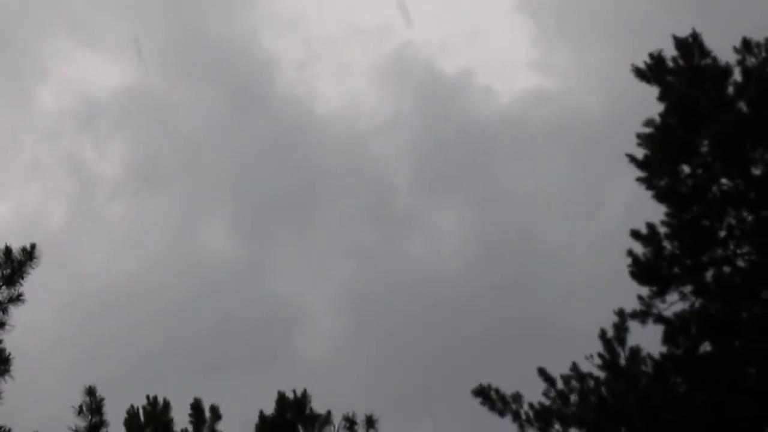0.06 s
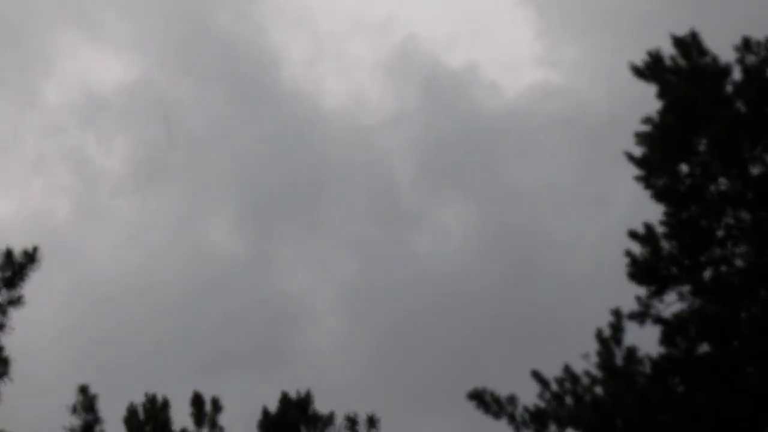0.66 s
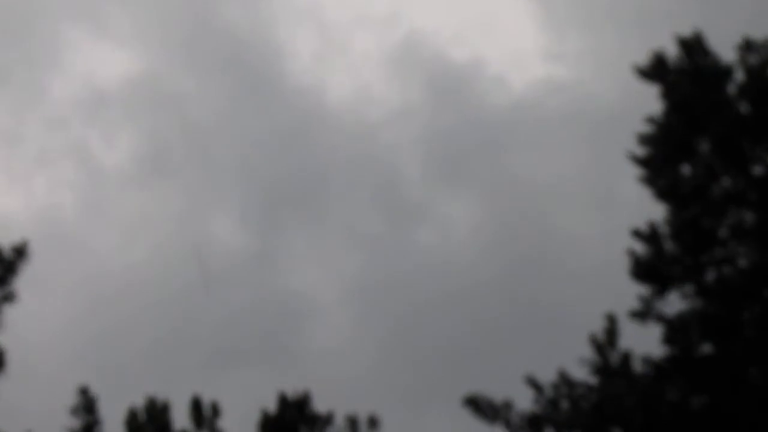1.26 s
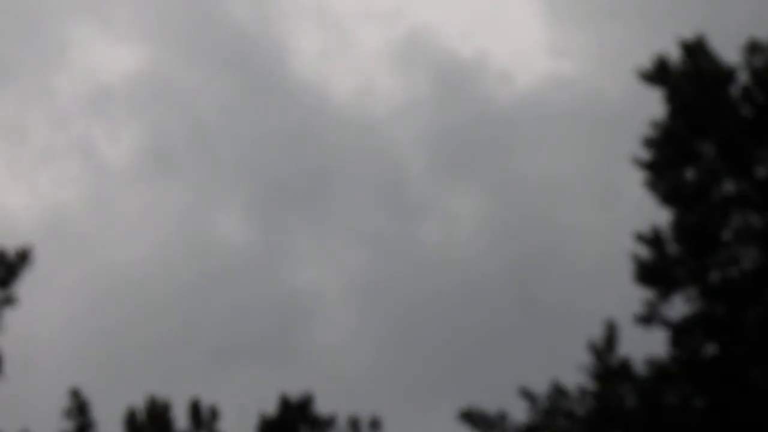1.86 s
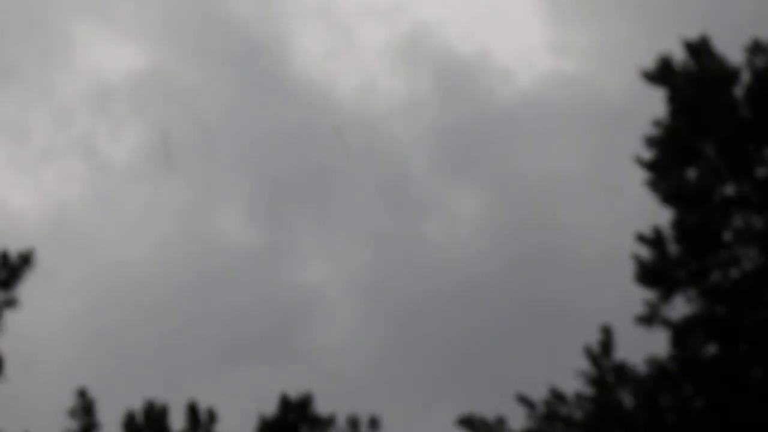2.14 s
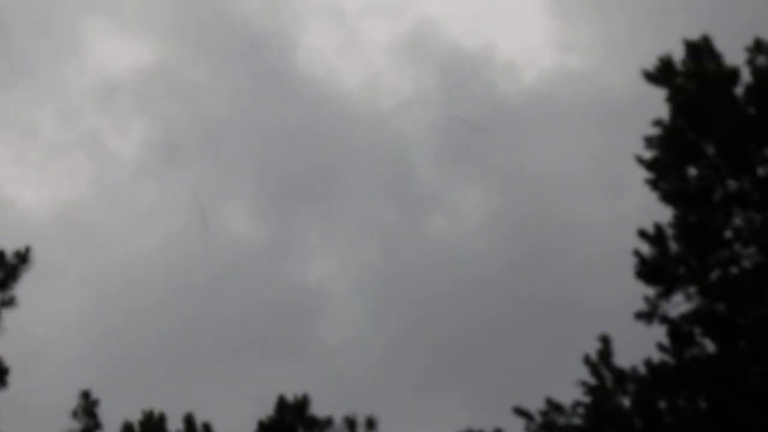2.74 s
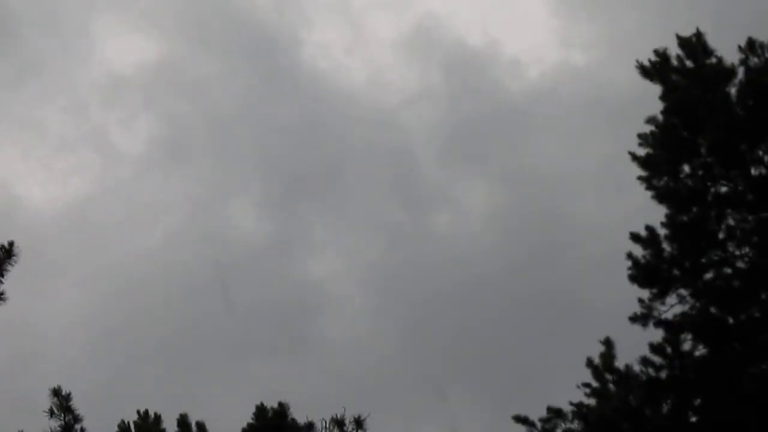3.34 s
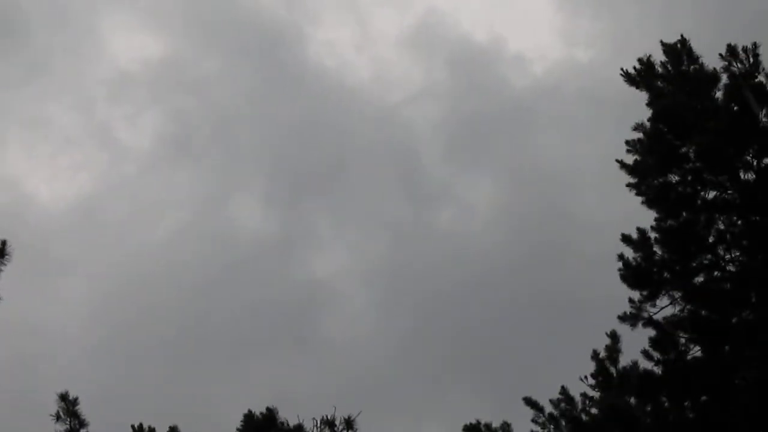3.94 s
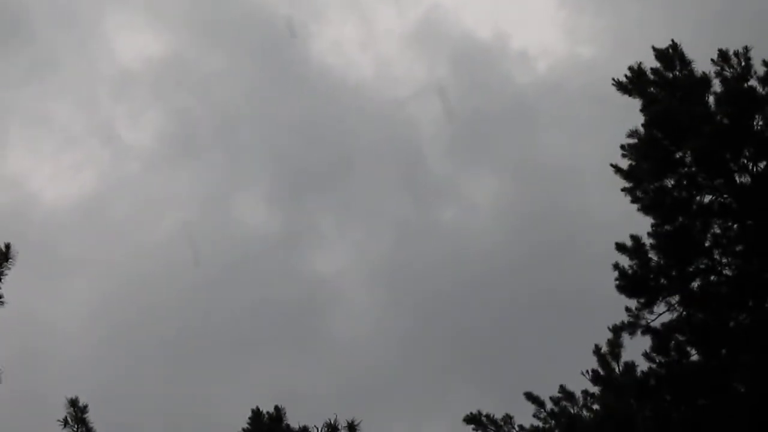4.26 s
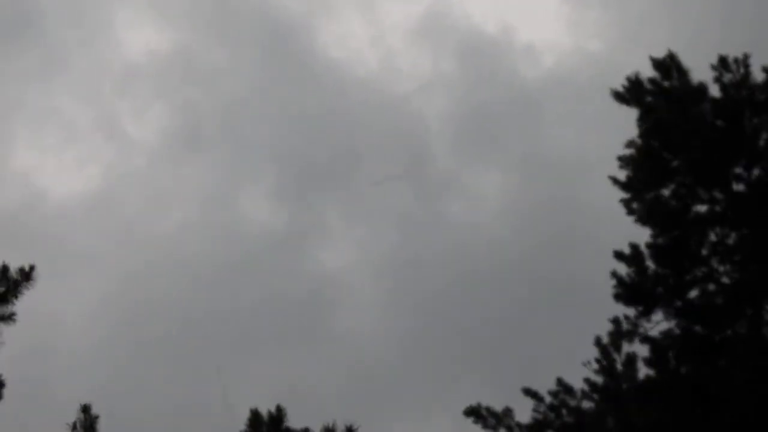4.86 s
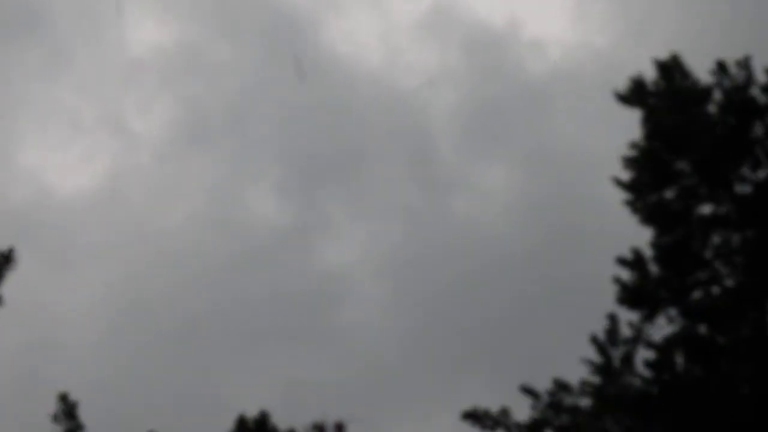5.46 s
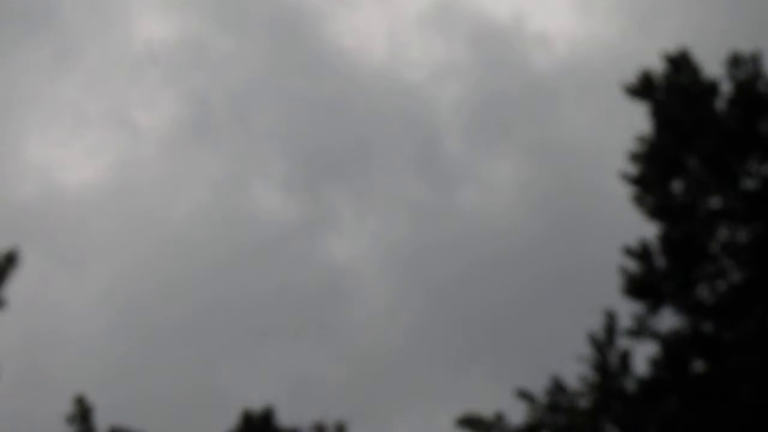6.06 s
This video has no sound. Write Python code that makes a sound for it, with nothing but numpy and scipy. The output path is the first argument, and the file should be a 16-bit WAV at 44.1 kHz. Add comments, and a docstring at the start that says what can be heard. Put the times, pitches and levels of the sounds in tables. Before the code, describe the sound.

Outdoors among trees, light rain makes a soft, wide hiss, with sharp ticks on nearby leaves and a few fat drips. Far thunder dominates from the start, rumbling and booming several times, then fading after about four seconds. The rain carries on with dull slaps of water on the ground. Close to the microphone sit a quiet motor hum and a barely audible lens whirr.

```python
"""Distant thunder rolls for four seconds, ends in a heavy double boom and dies away over light rain.
Shock waves from all along the lightning channel crowd into a rumble; the strongest land as booms.
Far drops merge into patter and hiss among the trees, near ones tick on leaves, fat drips splash
and run-off slaps the ground. A small motor hums throughout and a lens drive whirrs faintly."""
import sys
import numpy as np
from scipy import signal
from scipy.fft import rfft, irfft, next_fast_len
from scipy.io import wavfile
from scipy.ndimage import uniform_filter1d

SR = 44100
rng = np.random.default_rng(int(sys.argv[2]) if len(sys.argv) > 2 else 0)


def log_audio(samples):
    """Write samples as a 16-bit WAV file to the path given in sys.argv[1]."""
    # one column per channel
    frames = np.atleast_2d(samples).T
    # limit to full scale, then quantise
    limited = np.clip(frames, -1, 1)
    pcm = np.round(limited * 32767).astype(np.int16)
    wavfile.write(sys.argv[1], SR, pcm)


N = 272979
TIME = np.arange(N) / SR
SIDES = np.array([[1], [-1]])   # left, right
ATTACK_S, RELEASE_DB_PER_S, BASS_RELEASE_DB_PER_S = 0.026, 88, 78


def thunder_roll(body_db, bass_db, growl_db, crackle_db, shudder_db):
    """Shocks from all along the crooked channel arrive in a crowd, dulled by miles of air."""
    # The tone of each thunder layer. Each row: frequency in Hz, relative level in dB.
    body_colour = [(50, -30), (85, -12), (103, 4.5), (146, -3.5), (192, 0.5), (261, -6.5), (307, -21),
                   (345, -21.5), (400, -40.5), (520, -38.5), (880, -120)]
    bass_colour = [(48, -8), (55, -23), (63, 2.5), (78, 0), (95, -2.5), (112, -6.5)]
    shudder_colour = [(18, -24), (28, -23), (40, -6), (52, -3), (64, -27)]
    growl_colour = [(220, -10), (300, 2), (350, -6.5), (420, -14.5), (600, -28), (850, -24), (1300, -57)]
    crackle_colour = [(380, 5), (480, 13), (650, 11.5), (850, -5.5), (1300, -14)]
    body, bass, growl, crackle = thunder_envelopes()
    shudder = bass ** 0.49   # the deepest layer follows about half of the bass's swing in dB
    out = from_db(body_db) * body * evened(outdoors(arrivals(700, 1.55), body_colour), span_s=0.073)
    out += from_db(bass_db) * bass * evened(outdoors(arrivals(400, 0.77), bass_colour), span_s=0.074)
    out += from_db(shudder_db) * shudder * evened(outdoors(arrivals(300, 2), shudder_colour), span_s=0.42)
    # shocks with a shorter path keep their sharper edges; the crackle leans right
    out += from_db(growl_db) * growl * outdoors(arrivals(600, 1.9), growl_colour)
    out += from_db(crackle_db - 1.5 * SIDES) * crackle * outdoors(arrivals(350, 2.9), crackle_colour)
    return out


def thunder_envelopes():
    """Peals add in power to a fading rumble: gains for the body, bass, growl and crackle."""
    # One peal from each stretch of the channel. Each row: start and hold in seconds,
    # relative level in dB, then offsets in dB for bass, growl and crackle.
    peals = [(-0.04, 0.013, -10.5, -19, -21, -33), (0.093, 0.079, -29, 8.5, -9, -28),
             (0.168, 0.026, -24.5, -1, -12, -36), (0.417, 0.13, -24, -6, -19, -28.5),
             (0.617, 0.033, -15.5, -17, -24, -35), (1.002, .04, -24, -2.5, -13, -38),
             (1.169, .10, -14.5, -5, -21, -33.5), (1.316, 0.068, -14, -7, -22, -29),
             (1.46, 0.09, -24, -8, -14, -29), (1.652, 0.17, -19.5, -4, -24, -30),
             (1.94, 0.12, -33.5, 1, -22, -36), (2.217, 0.052, -26.5, 4, -34, -42),
             (2.457, .14, -24.5, 3.5, -19, -44), (2.719, 0.17, -21.5, -7, -21, -46),
             (3.23, 0.032, -23, -2, -32, -46), (3.386, 0.094, -35.5, 11, -32, -44),
             (3.694, 0.13, -22, 7, -28, -47), (3.792, 0.066, -21, 3.5, -10.5, -49),
             (4.173, 0.18, -34.5, 7, -23, -30)]
    sag_db_per_s, fade_db_per_s, fade_start_s = 0.36, 12.5, 4.11
    rumble = from_db(-23 - sag_db_per_s * TIME - fade_db_per_s * np.maximum(TIME - fade_start_s, 0))
    # all but the crackle settle on a floor, a far murmur
    body = np.hypot(rumble, from_db(-39))
    bass = np.hypot(rumble * from_db(-9.5), from_db(-41))
    growl = np.hypot(rumble * from_db(-21.5), from_db(-52))
    crackle = rumble * from_db(-35)
    for s, hold_s, db, bass_db, growl_db, crackle_db in peals:
        peal = from_db(db) * swell(s, hold_s, RELEASE_DB_PER_S)
        body = np.hypot(body, peal)
        bass = np.hypot(bass, from_db(db + bass_db) * swell(s, hold_s, BASS_RELEASE_DB_PER_S))
        growl = np.hypot(growl, peal * from_db(growl_db))
        crackle = np.hypot(crackle, peal * from_db(crackle_db))
    return body, bass, growl, crackle


def thunder_booms(trim_db, low_cut_ratio, high_hz):
    """Each strong front is one N-shaped pressure wave, its corners rounded off on the way."""
    # The strongest shock fronts. Each row: start in seconds, peak in dB before trim, pitch in Hz.
    fronts = [(0.007, -5, 115), (0.201, -23, 40), (0.209, -13, 122), (1.401, -12, 109), (1.790, -18, 39.8),
              (1.797, -0.5, 127), (1.812, -4, 112), (2.835, -6.5, 118), (3.285, -5, 195), (3.738, -12, 65),
              (3.815, -2.5, 70.6)]
    out, t = np.zeros((2, N)), TIME[:SR // 8]
    for s, db, hz in fronts:
        n_wave = (1 - 2 * t * hz) * (t * hz < 1)
        boom = band(n_wave, low_cut_ratio * hz, high_hz, order=4)
        add_at_peak(out, s, boom, db + trim_db)
    return out


def thunder_echoes(trim_db):
    """The farthest echoes come back with only a low, hollow note left."""
    # The last echoes. Each row: start and hold in seconds, level in dB before trim.
    echoes = [(4.61, 0.33, -37.5), (5.535, 0.017, -56), (5.704, 0.036, -35), (5.88, 0.073, -34),
              (6.134, .04, -39)]
    # Their hollow tone. Each row: frequency in Hz, relative level in dB.
    echo_colour = [(85, -6), (105, 2), (120, 3), (140, -12)]
    gain = sum(from_db(db + trim_db) * swell(s, hold_s, RELEASE_DB_PER_S) for s, hold_s, db in echoes)
    return gain * evened(outdoors(arrivals(420, 3.0), echo_colour), span_s=0.25)


def rain(patter_db, hiss_db, leaf_drops_db, ground_drops_db):
    """Countless far drops merge into patter and hiss; nearer ones stand out as grains."""
    # Rain on the ground and on foliage. Each row: frequency in Hz, relative level in dB.
    patter_colour = [(310, -9), (520, 0), (951, -7.5), (1100, -8), (1250, -7), (1520, -11.5), (1650, -10),
                     (2200, -29), (2860, -47), (4840, -120)]
    hiss_colour = [(1120, -6), (1900, -1.5), (7700, -2), (8500, -1), (10700, -3.2), (12000, -6),
                   (13500, -7), (15600, -15.5)]
    patter = from_db(patter_db + 0.41 * drift(25.12)) * outdoors(arrivals(2500, 2.3), patter_colour)
    hiss = from_db(hiss_db + 0.85 * drift(30)) * outdoors(arrivals(14000, 2.9), hiss_colour)
    on_leaves = from_db(leaf_drops_db) * rain_grains([9400, 9200, 10600, 10900], per_s=100, spray_s=0.0064)
    on_ground = from_db(ground_drops_db) * rain_grains([1710, 2420, 3380, 4200], per_s=70, spray_s=0.0058)
    opening = from_db(-5 * np.maximum(1 - TIME / 0.82, 0))   # comes up 5 dB at the start
    return patter + opening * (hiss + on_leaves + on_ground)


def rain_grains(pitches_hz, per_s, spray_s):
    """Each nearer drop throws a short burst of spray, pitched by what it hits; rms 1."""
    out = 0
    for hz in pitches_hz:
        hits = np.abs(arrivals(per_s / len(pitches_hz), 1.7)[0]) ** 2
        power = signal.lfilter([1], [1, -np.exp(-1 / (spray_s * SR))], hits + 1e-18)
        spray = np.sqrt(power) * rng.standard_normal((2, N))
        out = out + band(spray, hz / 2 ** (1 / 6), hz * 2 ** (1 / 6))
    return rms_one(out)


def drops(rows, trim_db, octaves, rise_s, hit_s, spray_db, spray_s, alike):
    """A drop bursts on impact, then its scattered droplets land."""
    out, t = np.zeros((2, N)), TIME[:SR // 4]
    shape = (1 - np.exp(-t / rise_s)) * (np.exp(-t / hit_s) + from_db(spray_db) * np.exp(-t / spray_s))
    for s, db, hz, pan_db in rows:
        burst = shape * stereo(rng.standard_normal((2, len(t))), alike)
        burst = band(burst, hz / 2 ** (octaves / 2), hz * 2 ** (octaves / 2))
        add_at_peak(out, s, burst, db + trim_db + SIDES * pan_db / 2)
    return out


def big_leaf_ticks():
    """Big drops strike nearby leaves with a sharp, bright tick."""
    # Each row: start in seconds, peak in dB before trim and pan, pitch in Hz, leftward pan in dB.
    hits = [(0.323, -37, 8300, 0), (0.412, -43, 10800, 18), (0.606, -34, 9680, -0.5),
            (0.8584, -35, 10800, -0.5), (1.0375, -43, 9750, 0.0), (1.4711, -32.5, 12400, 4),
            (1.549, -48, 7120, -1.0), (1.7335, -34.5, 9700, -1.0), (2.1291, -34, 12000, 3),
            (2.3301, -37, 12800, 0.0), (2.5534, -36, 10400, -1.0), (3.019, -36, 8490, -3),
            (3.1796, -29, 10800, 1), (3.274, -31.5, 10400, 0.0), (3.473, -35, 11300, 0.0),
            (4.1925, -30, 10700, -1.5), (4.4867, -33, 10300, 0.0), (4.8618, -35, 13600, 2),
            (5.0823, -33.5, 10700, 0.0)]
    return drops(hits, trim_db=-0.5, octaves=0.57, rise_s=0.0003, hit_s=0.0028,
                 spray_db=-8, spray_s=0.03, alike=0.1)


def small_leaf_ticks(per_s, centre_hz):
    """Small drops hit nearby leaves at random, each with its own size, pitch and place."""
    hits = [(when * N / SR, -43.5 - 0.9 * np.log(max(size, 0.05)),
             centre_hz * 2 ** ((leaf - 0.5) / 2), 2.5 * (2 * place - 1))
            for when, size, leaf, place in rng.random((int(per_s * N / SR), 4))]
    return drops(hits, trim_db=-1.5, octaves=0.55, rise_s=0.00037, hit_s=0.002,
                 spray_db=-10, spray_s=0.016, alike=0.1)


def drip_splashes():
    """Fat drips splash lower in pitch, with a softer attack and a longer spray."""
    # Each row: start in seconds, peak in dB before trim and pan, pitch in Hz, leftward pan in dB.
    drips = [(0.166, -40, 2100, 0), (0.215, -42, 2700, -4), (0.289, -43, 3240, -3), (0.506, -44, 3400, -4),
             (0.613, -35.5, 3550, -5), (0.724, -43, 2210, 2), (1.142, -39.5, 3000, -5),
             (1.275, -36.5, 2010, -1.5), (1.416, -41, 3220, -2), (1.656, -46, 2760, -3),
             (2.03, -39, 3880, -4), (2.59, -44, 2510, -1), (2.806, -41, 3740, -6), (2.963, -43, 2450, -2.5),
             (3.479, -37.5, 3560, -4), (3.515, -42, 3240, -3), (4.155, -45, 2650, -3),
             (4.625, -41, 2430, 8), (5.185, -42, 2300, -1.5), (5.23, -40, 3400, -4)]
    return drops(drips, trim_db=-1, octaves=0.76, rise_s=0.0029, hit_s=0.0046,
                 spray_db=-15.5, spray_s=0.075, alike=0.12)


def runoff_slaps(trim_db, rise_s, decay_s, alike):
    """Run-off spatters onto dull ground and excites its few broad resonances."""
    # Water landing. Each row: start in seconds, peak in dB before trim.
    slaps = [(1.046, -45), (2.068, -40), (2.378, -38), (2.585, -37), (3.095, -34.5), (3.499, -36),
             (3.622, -36), (4.165, -38), (4.626, -35.5), (4.671, -34.5), (5.158, -33.5), (5.199, -35),
             (5.664, -37), (5.730, -35.5), (5.765, -52), (6.169, -37)]
    # The surface's resonances. Each row: centre and width in Hz, relative gain in dB.
    modes = [(587, 210, 9.5), (966, 180, 3), (1474, 140, 3), (2470, 530, -6)]
    out, t = np.zeros((2, N)), TIME[:SR // 4]
    shape = (1 - np.exp(-t / rise_s)) * np.exp(-t / decay_s)
    for s, db in slaps:
        spatter = shape * stereo(rng.laplace(size=(2, len(t))), alike)
        ring = sum(from_db(gain) * band(spatter, hz - width / 2, hz + width / 2)
                   for hz, width, gain in modes)
        add_at_peak(out, s, ring, db + trim_db)
    return out


def motor_hum(trim_db, waver):
    """A small motor hums, its sound shifting from side to side and its speed wavering very slightly."""
    # The hum's level and pan. Each row: time in seconds, relative level in dB, leftward pan in dB.
    moves = [(0, -48, 5), (0.9, -46, 0.5), (1.4, -46.5, -3), (3.2, -47, 2.5), (4.3, -47.5, 1.3),
             (5.4, -46.5, -3.8), (5.9, -45, -4.5), (6.19, -44, -5)]
    # The motor's partials. Each row: frequency in Hz, relative level in dB.
    partials = [(451.1, 0.82), (902.2, -19), (1495, -21)]
    times, levels, pans = np.transpose(moves)
    level_db, pan_db = np.interp(TIME, times, levels), np.interp(TIME, times, pans)
    running_s = TIME + waver * np.cumsum(drift(12)) / SR
    lead_s = np.array([[0], [0.0002]])   # reaches the right side first
    tone = sum(from_db(db) * np.sin(2 * np.pi * hz * (running_s + lead_s)) for hz, db in partials)
    return np.sqrt(2) * from_db(level_db + trim_db + SIDES * pan_db / 2) * tone


def lens_whirr(level_db, hz, width_hz):
    """A focus drive sings in one narrow resonance."""
    gain = from_db(level_db) * swell(start_s=0.4, hold_s=3.45, release_db_per_s=32)
    return gain * rms_one(band(rng.standard_normal(N), hz - width_hz / 2, hz + width_hz / 2))


def arrivals(per_s, spread_db):
    """Two unrelated streams of random impulses, many small and a few large."""
    sizes = from_db(spread_db * np.minimum(rng.exponential(1, (2, N)), 4))
    return rms_one(sizes * rng.choice([-1, 1], (2, N)) * (rng.random((2, N)) < per_s / SR))


def outdoors(streams, colour):
    """Colour two streams and spread them, centred in the bass and wide in the treble; rms 1."""
    # Stereo width. Each row: frequency in Hz, left-right correlation.
    likeness = [(60, .9996), (130, .9987), (220, .993), (330, .86), (500, .8), (1000, .52), (1500, .25),
                (2400, -.2), (4000, -.25), (8000, -.12), (14000, 0)]
    # Stereo lean. Each row: frequency in Hz, left minus right in dB.
    balance = [(60, -.1), (130, .2), (220, 1), (320, 3), (450, 0), (700, -1), (1300, -.3), (2400, -1.8),
               (4400, -2.2), (8100, -1.7), (11000, -.5), (15000, 4)]
    size = next_fast_len(N + SR // 2)
    hz = np.arange(size // 2 + 1) * SR / size
    octaves_outside = np.abs(np.log2((hz + 1) / np.clip(hz + 1, colour[0][0], colour[-1][0])))
    spectra = rfft(streams, size) * from_db(at_hz(colour, hz) - 40 * octaves_outside)
    pair = stereo(spectra, at_hz(likeness, hz)) * from_db(SIDES * at_hz(balance, hz) / 2)
    return rms_one(irfft(pair, size)[:, :N])


def stereo(streams, alike):
    """Mix two unrelated streams into left and right with correlation `alike`."""
    mid, side = streams
    return np.sqrt(1 + alike) * mid + SIDES * np.sqrt(1 - alike) * side


def swell(start_s, hold_s, release_db_per_s):
    """Attack, hold and release, as a gain."""
    t = TIME - start_s
    return np.clip(t / ATTACK_S, 0, 1) * from_db(-release_db_per_s * np.maximum(t - ATTACK_S - hold_s, 0))


def evened(x, span_s):
    """Hold a rumble's loudness steady, keeping its grain."""
    power = uniform_filter1d(np.mean(x ** 2, axis=0), int(span_s * SR))
    return x / np.sqrt(power + 1e-4)


def drift(per_s):
    """A slow random wander; rms 1."""
    knots = rng.standard_normal(4096)
    return rms_one(np.interp(TIME * per_s, np.arange(len(knots)), knots))


def band(x, low_hz, high_hz, order=2):
    """Causal band-pass."""
    return signal.sosfilt(signal.butter(order, [low_hz, high_hz], "band", fs=SR, output="sos"), x + 1e-18)


def at_hz(points, hz):
    """Read a table on a log-frequency axis."""
    f, value = np.transpose(points)
    return np.interp(np.log(hz + 1e-3), np.log(f), value)


def add_at_peak(out, s, sound, peak_db):
    """Mix a sound in at a time and a peak level."""
    start = int(s * SR)
    scaled = from_db(peak_db) * sound / np.abs(sound).max()
    out[:, start:start + sound.shape[-1]] += scaled[..., :N - start]


def from_db(db):
    """Decibels to gain."""
    return 10 ** (np.asarray(db) / 20)


def rms_one(x):
    """Scale to unit rms."""
    return x / np.sqrt(np.mean(x ** 2) + 1e-20)


def scene():
    """Far thunder over the rain, with drips and a quiet hum close by."""
    thunder = thunder_roll(body_db=-1.18, bass_db=-2.4, growl_db=-2, crackle_db=-1, shudder_db=-29)
    thunder += thunder_booms(trim_db=-3, low_cut_ratio=0.62, high_hz=220) + thunder_echoes(trim_db=-1.5)
    drips = big_leaf_ticks() + drip_splashes()
    runoff = runoff_slaps(trim_db=-2.5, rise_s=0.0023, decay_s=0.037, alike=0.93)
    wash = rain(patter_db=-52, hiss_db=-50, leaf_drops_db=-56.5, ground_drops_db=-63.5)
    machinery = motor_hum(trim_db=-2.2, waver=0.00047) + lens_whirr(level_db=-65, hz=1246, width_hz=86)
    ticks = small_leaf_ticks(per_s=18, centre_hz=11300)
    return thunder + wash + drips + ticks + runoff + machinery


def record(dry):
    """A steep low-pass takes off the very top."""
    cutoff_hz = 15750
    return signal.sosfilt(signal.ellip(12, 0.1, 90, cutoff_hz, fs=SR, output="sos"), dry)


dry = scene()
out = record(dry)
log_audio(out)
```